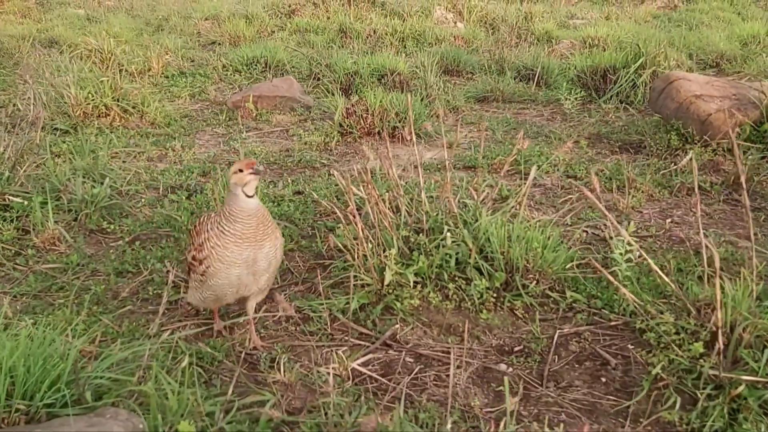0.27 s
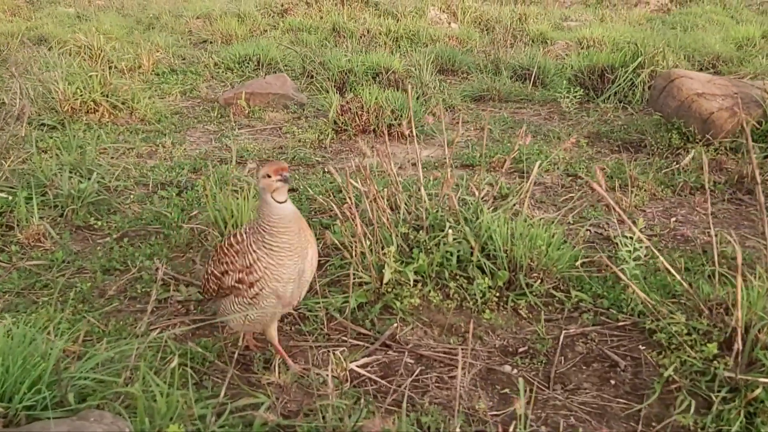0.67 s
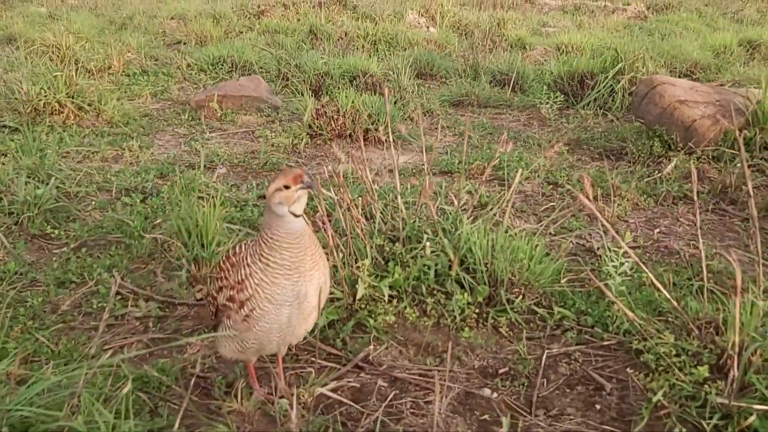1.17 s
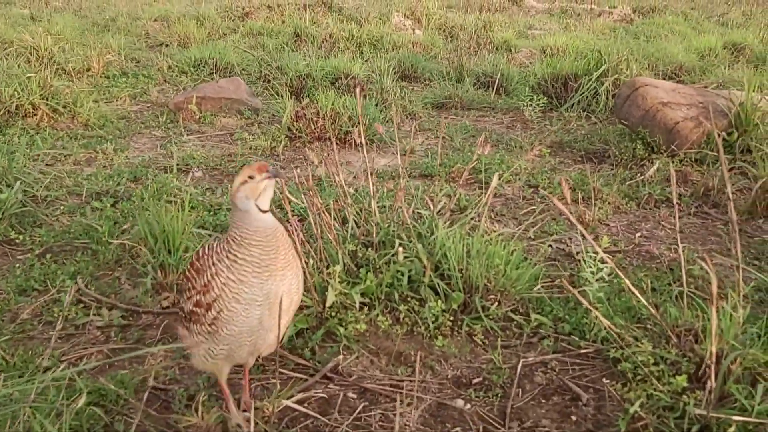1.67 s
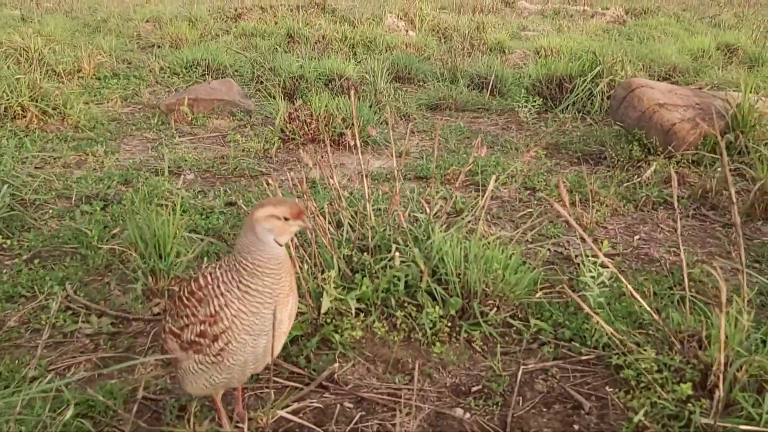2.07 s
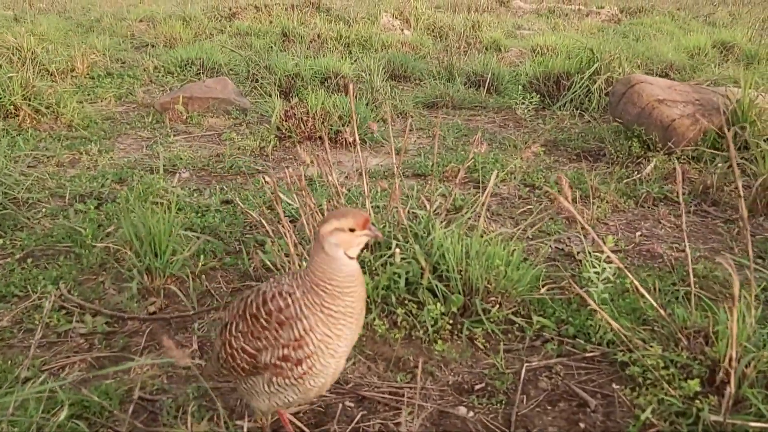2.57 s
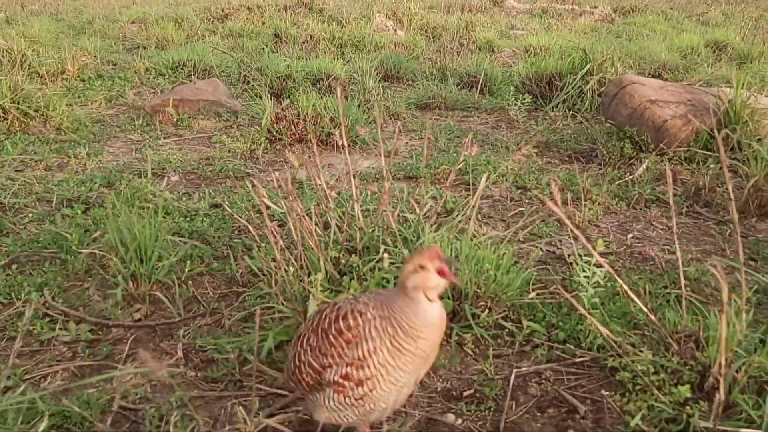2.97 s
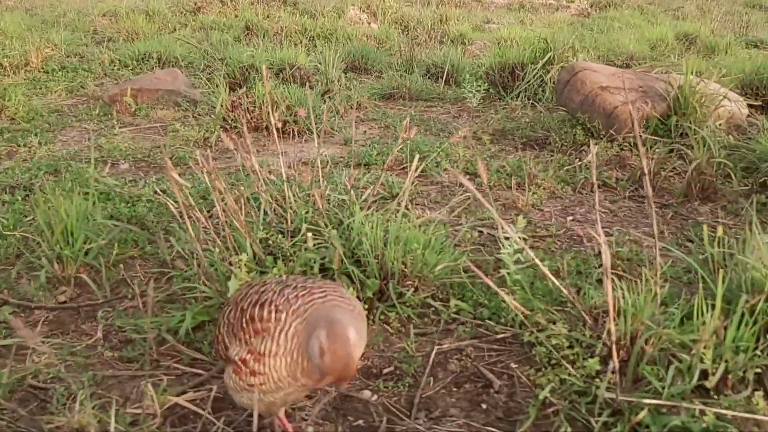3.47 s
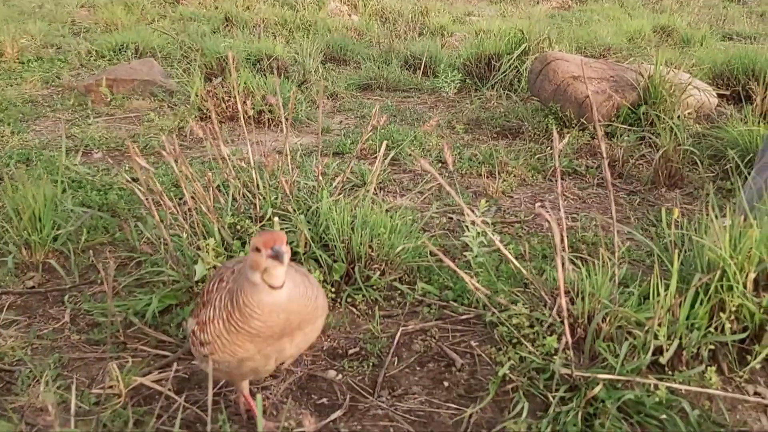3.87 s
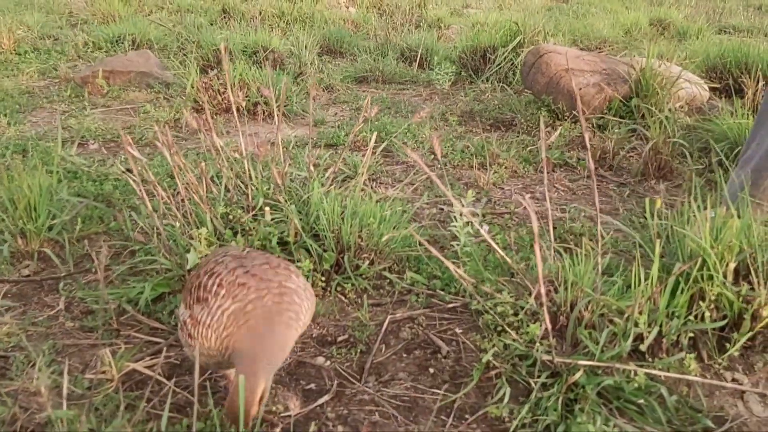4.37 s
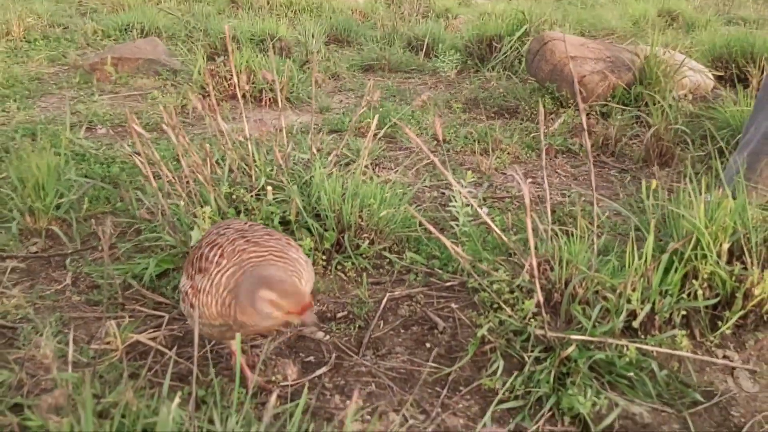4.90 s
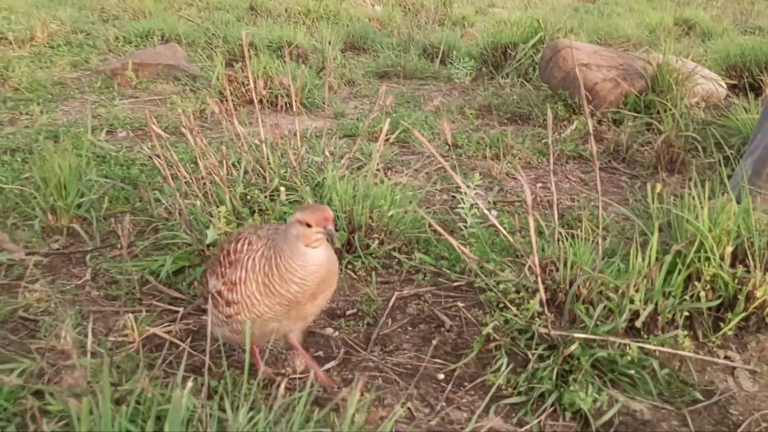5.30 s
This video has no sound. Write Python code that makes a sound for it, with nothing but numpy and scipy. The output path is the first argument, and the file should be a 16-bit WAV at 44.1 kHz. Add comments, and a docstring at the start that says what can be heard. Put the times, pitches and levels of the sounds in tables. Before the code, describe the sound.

Two wild game birds duet close by with piercing whistles, raspy high calls and hoarse clucks, over a faint rumble of wind.

```python
"""Two francolins duet close by in an open field, over a faint hush and a low rumble of air.
One opens with a piercing level whistle, a nearly pure tone of its syrinx, and gives eight in all.
The other breaks in on the first six: its syrinx rasps, twice locks into a clear note and slides down,
then pulses ring its throat in ever softer hoarse clucks. The seventh whistle goes unanswered,
a few pecks and steps crunch in the dry grass, and one more whistle closes the scene."""
import sys
import numpy as np
from scipy import signal
from scipy.fft import rfft, irfft, next_fast_len
from scipy.io import wavfile
from scipy.ndimage import uniform_filter1d, minimum_filter1d

SR = 44100
rng = np.random.default_rng(int(sys.argv[2]) if len(sys.argv) > 2 else 0)


def wrap_up_sound(samples):
    """Save the sound to the file named by the first command line argument, as 16-bit audio."""
    columns = np.atleast_2d(samples).T
    # keep every value between -1 and 1, then stretch to whole-number steps
    tamed = np.clip(columns, -1, 1)
    steps = np.round(tamed * 32767).astype(np.int16)
    wavfile.write(sys.argv[1], SR, steps)


N = 244302
TIME = np.arange(N) / SR


def from_db(db):
    """Decibels to gain."""
    return 10 ** (np.asarray(db) / 20)


def rms_one(x):
    """Scale to unit rms."""
    return x / np.sqrt(np.mean(x ** 2) + 1e-20)


def follow(rows, at):
    """Read each column of a table as a curve along its first column."""
    first, *columns = np.transpose(rows)
    return [np.interp(at, np.maximum.accumulate(first), c) for c in columns]


def bell(x, centre, width):
    """A smooth hump of height 1."""
    return 1 / (1 + ((x - centre) / width) ** 2) ** 2


def step(x, at, width):
    """A smooth rise from 0 to 1."""
    return .5 + .5 * np.tanh(2 * (x - at) / width)


def window(start, end, rise, fall):
    """Sample numbers of an event and its soft-edged gate; times in seconds."""
    i = np.arange(max(int(start * SR), 0), min(int(end * SR), N))
    edge = np.clip(np.minimum((i / SR - start) / rise, (end - i / SR) / fall), 0, 1)
    return i, np.sin(edge * np.pi / 2) ** 2


def waver(rate, size):
    """Random modulation that glides to a new value `rate` times a second."""
    knots = rng.standard_normal(size + 2)
    return np.interp(np.arange(size) * min(rate / SR, 1), np.arange(size + 2), knots)


def noise(spectrum, size):
    """Coloured noise at unit rms, rolled off beyond both ends of its spectrum."""
    hz, db = np.transpose(spectrum)
    padded = next_fast_len(size)
    f = np.fft.rfftfreq(padded, 1 / SR) + 1
    colour = from_db(np.interp(np.log(f), np.log(hz), db))
    roll_off = np.minimum(f / hz[0], 1) ** 2 * np.minimum(hz[-1] / f, 1) ** 2
    return rms_one(irfft(rfft(rng.standard_normal(padded)) * colour * roll_off, padded)[:size])


def stereo_noise(spectrum, apart_db):
    """A noise bed, partly shared and partly each ear's own."""
    shared = noise(spectrum, N)
    return rms_one(shared + from_db(apart_db) * np.array([noise(spectrum, N), noise(spectrum, N)]))


def phase_of(hz):
    """Running phase of an oscillator."""
    return 2 * np.pi * np.cumsum(hz) / SR


def formant(x, hz, width_hz):
    """A throat resonance: two band-passes in series, the second twice as wide."""
    for width in (width_hz, 2 * width_hz):
        r = np.exp(-np.pi * width / SR)
        feedback = [1, -2 * r * np.cos(2 * np.pi * hz / SR), r * r]
        x = signal.lfilter(np.array([1, 0, -1]) * (1 - r * r) / 2, feedback, x)
    return x


def place(x, pan_db, lag_ms=0):
    """Pan a sound, positive to the left; the right ear hears it lag_ms later."""
    left = from_db(pan_db)
    late = np.roll(x, round(lag_ms * SR / 1000))
    return np.array([left * x, late]) * 2 / (1 + left)


# Colour of the quiet field: freq_hz, density_db
HUSH_SPECTRUM = [(250, -9.5), (450, -14.5), (800, -24), (1800, -25.5), (3000, -33.5), (6000, -36.5),
                 (10000, -42.5), (16000, -46)]


def field_hush(level_db=-70):
    """The open field lays a faint, steady bed under everything."""
    return from_db(level_db) * stereo_noise(HUSH_SPECTRUM, apart_db=1)


# Contour of the breeze: time_s, level_db
BREEZE_CONTOUR = [(0.0, -64), (0.23, -61), (0.49, -55.5), (0.89, -62.5), (1.14, -60), (2.73, -65.5),
                  (2.93, -65.5), (5.54, -63.5)]
# Low bumps of air: centre_s, level_db
AIR_BUMPS = [(0.301, -51.5), (0.504, -47), (.63, -43.5), (1.07, -49), (1.15, -48.5)]
# Colour of the rumble: freq_hz, density_db
RUMBLE_SPECTRUM = [(25, -17), (45, -6), (65, 2.5), (100, 2), (135, -3.5), (175, -7), (230, -15), (330, -13),
                   (450, -27.5), (600, -37.5)]


def wind_rumble(lift_db=4.5, gust_db=3, gusts_per_s=28, bump_width_s=.048):
    """Light air rumbles on the microphone, with a few soft bumps early on."""
    contour_db, = follow(BREEZE_CONTOUR, TIME)
    breeze = from_db(contour_db + lift_db + gust_db * waver(gusts_per_s, N))
    bumps = sum(from_db(db) * bell(TIME, centre, bump_width_s) for centre, db in AIR_BUMPS)
    return (breeze + bumps) * stereo_noise(RUMBLE_SPECTRUM, apart_db=5.5)


# Slaps off ground and stones: delay_s, left_db, right_db
GROUND_ECHOES = [(0.013, -29, -22.5), (.070, -46.5, -46)]


def ground_reflections(x, dull_hz=3200, bright_hz=4500):
    """Grass close by scatters the calls at once; stones further off send back dull echoes."""
    t = TIME[:SR // 2]

    def scatter(db, t60_s):
        """A dying spray of reflections, different at each ear."""
        spray = rng.standard_normal((2, len(t))) * from_db(-60 * t / t60_s)
        return spray * from_db(db) / np.sqrt(np.sum(spray[0] ** 2))

    far, near = scatter(db=-41, t60_s=.22), scatter(db=-17, t60_s=.0067)
    for delay, *ear_db in GROUND_ECHOES:
        far[:, int(delay * SR)] += from_db(ear_db)
    dull = signal.sosfilt(signal.butter(2, dull_hz, fs=SR, output="sos"), x + 1e-18)
    # thin stalks reflect only the short waves
    bright = signal.sosfilt(signal.butter(2, bright_hz, "high", fs=SR, output="sos"), x + 1e-18)
    return (signal.fftconvolve(dull, far, axes=1) + signal.fftconvolve(bright, near, axes=1))[:, :N]


# Pecks and steps: start_s, level_db, t60_s
PECK_CUES = [(4.815, -70.5, 0.033), (4.885, -82, 0.03), (4.930, -80, 0.03), (5.155, -62, 0.032),
             (5.191, -68, 0.057), (5.212, -63, 0.08), (5.232, -63.5, 0.037)]
# Colour of dry stalks and soil: freq_hz, density_db
STALK_SPECTRUM = [(300, 2), (700, 8.5), (1100, 1), (1700, 3.5), (2500, -15), (3400, -9), (4500, -19),
                  (6000, -23), (9000, -29.5), (15000, -28)]


def pecks(grain_db=7.4):
    """Beak and feet make short, grainy crunches in the dry grass."""
    out = np.zeros(N)
    for start, db, t60 in PECK_CUES:
        i, gate = window(start, start + t60, rise=.0012, fall=.005)
        crunch = rms_one(noise(STALK_SPECTRUM, len(i)) * from_db(grain_db * waver(530, len(i))))
        out[i] += gate * crunch * from_db(db - 60 * (i / SR - start) / t60)
    return out


# Stereo image of the answering bird: freq_hz, pan_db, left_lead_rad
ANSWER_IMAGE = [(100, 0, 0), (600, -1, .5), (1500, -7, 1.45), (2650, -5.5, 1.9), (4100, -5, 1.9),
                (5200, -4, -1.5), (7000, 3, -1.1), (8200, -3, -1.0), (12000, -5, -1.2), (16000, -5, -1.0)]


def microphone_shadow(x):
    """The microphone's body shades and delays each frequency differently at its two ports."""
    size = next_fast_len(N + 2000)
    pan_db, lead = follow(ANSWER_IMAGE, np.fft.rfftfreq(size, 1 / SR))
    left = from_db(pan_db)
    response = np.array([left, np.exp(-1j * lead)]) * 2 / (1 + left)
    return irfft(rfft(x, size) * response, size)[:, :N]


# Colour of the rasp in clucks and phrases: freq_hz, density_db
RASP_SPECTRUM = [(150, -27.5), (450, -20), (750, -28), (1200, -16.5), (1800, 9), (2250, -11.5), (2900, 7.5),
                 (3600, 5.5), (4600, -6.5), (5800, 3), (7500, -8), (9400, -15), (11500, -12),
                 (15500, -18.5)]


def rasp_noise(modulation):
    """The chaotic syrinx: hoarse noise, chopped by the modulation, at unit rms."""
    return rms_one(noise(RASP_SPECTRUM, len(modulation)) * modulation)


def squeak(progress, pulse_phase, strain, highest_hz=2800, end_hz=1693, ring_db=7, shimmer_db=2):
    """A rough squeak falls, from higher under more strain, and flares at the throat resonance."""
    size = len(progress)
    hz = end_hz + (highest_hz - end_hz) * strain * (1 - step(progress, at=.53, width=.2))
    ringing = bell(hz, centre=1850, width=260)
    flare = from_db(ring_db * ringing + shimmer_db * waver(400, size))
    chop = 1 + .45 * np.cos(pulse_phase)
    jitter = (.028 + .05 * (1 - ringing)) * waver(1200, size)
    wander = .025 * waver(50, size)
    tone = np.sin(phase_of(hz * (1 + jitter + wander)))
    return bell(progress, centre=.63, width=.29) * flare * chop * tone


# Clucks trailing each phrase: start_s, level_db, effort_0_to_1
CLUCK_CUES = [(.399, -21, 1), (.537, -24, 0.56), (0.67, -34.5, 0.16), (1.084, -22, 1), (1.226, -24.5, 0.58),
              (1.364, -34.5, 0.15), (1.836, -24, 1), (1.971, -25.5, 0.59), (2.112, -36.5, 0.05),
              (2.555, -23, 0.96), (2.692, -26, .58), (2.823, -40.5, 0.2), (3.274, -20.5, 0.94),
              (3.409, -39.5, 0.49), (3.557, -56.5, 0.22), (4.065, -27, 0.85), (4.194, -39.5, .33)]
# Throat resonances: freq_hz, width_hz, gain_db
THROAT_FORMANTS = [(380, 180, -25.5), (1333, 540, -2), (1704, 410, 12), (2730, 900, -15)]


def clucks(gentle_hz=531, effort_hz=78.98, gentle_s=.058, effort_s=.025, shimmer_db=5, tilt_db=6.5,
           catch_at=.49, held_db=-11, tire_db=-14, squeak_above=.38, squeak_db=8):
    """Uneven pulses on an arching pitch ring the throat; effort adds roughness, rasp and a squeak."""
    out = np.zeros(N)
    for start, db, effort in CLUCK_CUES:
        length = gentle_s + effort_s * effort
        i, gate = window(start, start + length, rise=.0041, fall=.019)
        progress, size = (i / SR - start) / length, len(i)
        hz = (gentle_hz + effort_hz * effort) * (1 - 1.3 * (progress - .33) ** 2)
        jitter = (.025 + .24 * effort) * waver(700, size)
        phase = phase_of(hz * (1 + jitter))
        opening = 1 + .21 * np.cos(phase)
        pulses = np.diff(phase // (2 * np.pi), prepend=0)
        pulses *= from_db(shimmer_db * effort * waver(400, size))
        turbulence = .085 * effort * opening * rng.standard_normal(size)
        voice = np.zeros(size)
        for k, (formant_hz, width_hz, gain_db) in enumerate(THROAT_FORMANTS):
            gain = from_db(gain_db + tilt_db * k * (effort - 2))   # gentle clucks are darker
            voice += (-1) ** k * gain * formant(pulses + turbulence, formant_hz, width_hz)
        # the harder the cluck, the more it is held back before it catches; then it tires
        held = 1 - step(progress, catch_at, width=.066)
        shape_db = held_db * effort * held + tire_db * (progress - catch_at) ** 2 - 1
        voice = rms_one(voice) * from_db(shape_db)
        rasp_level = bell(progress, centre=.46, width=.23) * from_db(-4 - 23 * (1 - effort))
        rasp = rasp_level * rasp_noise(opening)
        strain = max(effort - squeak_above, 0) / (1 - squeak_above)
        squeak_level = strain * from_db(squeak_db) * (1 - held / 2)
        out[i] += gate * from_db(db) * (voice + rasp + squeak_level * squeak(progress, phase, strain))
    return out


# Phrase timing around the start of its first note
LEAD_IN_S, BREAK_S, SECOND_NOTE_S, SLIDE_S, COLLAPSE_S, END_S = .048, .0255, .047, .07, .092, .125
FLIP_S = .004   # the syrinx needs this long to change between rasp and note


def syrinx(t):
    """How firmly the syrinx is locked on the note (0-1), and the jolt of each flip."""
    locked = step(t, 0, FLIP_S) - step(t, BREAK_S, FLIP_S) + step(t, SECOND_NOTE_S, FLIP_S)
    jolt = sum(bell(t, at, FLIP_S) for at in (-FLIP_S / 2, BREAK_S, SECOND_NOTE_S))
    return np.clip(locked, 0, 1), jolt


def thumps(t, decay_s=.012):
    """A short low thump sounds at each flip between rasp and note."""
    flips = (0, BREAK_S, SECOND_NOTE_S)
    envelope = sum(step(t, at, FLIP_S) * np.exp(-np.abs(t - at) / decay_s) for at in flips)
    return envelope * noise([(70, 4), (105, 4), (160, -9.5), (350, -7)], len(t))


def squeal(t, hz, rise_hz_per_s=6000, peak_s=-.038, jitter=.07, shimmer_db=4, throat_db=-3):
    """An unsteady upper vibration bites through the opening rasp; its first shove rings the throat."""
    pitch = (hz + rise_hz_per_s * (t + LEAD_IN_S / 2)) * (1 + jitter * waver(1800, len(t)))
    shimmer = from_db(shimmer_db * waver(700, len(t)))
    upper = bell(t, peak_s, width=.034) * shimmer * np.sin(phase_of(pitch))
    throat = rms_one(formant(rng.standard_normal(len(t)), hz=1900, width_hz=250))
    return upper + from_db(throat_db) * bell(t, peak_s, width=.012) * throat


# The answering bird's phrases: first_note_s, pitch_hz, note_db, octave_db, third_partial_db,
# rasp_db, squeal_hz, squeal_db, thump_db
PHRASE_CUES = [(0.197, 2587, -8.5, -11, -22, -25.5, 3400, -27.5, -53.5),
               (0.873, 2623, -6, -17.5, -24, -26.5, 3400, -38.5, -45),
               (1.623, 2634, -6.5, -15, -28, -26.5, 3300, -36, -51.5),
               (2.342, 2615, -6.5, -19.5, -24.5, -29, 3200, -18.5, -45),
               (3.063, 2652, -6.5, -21, -25, -24, 3550, -12, -39.5),
               (3.862, 2648, -14.5, -16, -20, -25, 4150, -18, -31.5)]


def phrases(rasp_flat=.085, sag_hz_per_s=700, slide_hz_per_s=17000, fade_db_per_s=316,
            subharmonic_db=-18, growl_hz=430, growl_depth=.95, growl_s=.0067, release_db_per_s=800):
    """The syrinx flips between a chaotic half-pitch rasp and a rich note, then collapses into a growl."""
    out = np.zeros(N)
    for start, hz, note_db, octave_db, third_db, rasp_db, squeal_hz, squeal_db, thump_db in PHRASE_CUES:
        i, gate = window(start - LEAD_IN_S, start + END_S, rise=.028, fall=.006)
        t, size = i / SR - start, len(i)
        locked, jolt = syrinx(t)
        second_note = step(t, SECOND_NOTE_S, FLIP_S)
        slide_age = np.maximum(t - SLIDE_S, 0)
        collapse = step(t, COLLAPSE_S - growl_s / 2, growl_s)
        last_gasp = bell(t, COLLAPSE_S + FLIP_S, growl_s)

        flatten = 1 - rasp_flat * (1 - locked) * (1 - jolt)
        pitch = hz * flatten - sag_hz_per_s * t - slide_hz_per_s * slide_age
        roughness = 1 - locked + collapse + slide_age / (END_S - SLIDE_S)
        phase = phase_of(pitch * (1 + (.002 + .045 * roughness) * waver(1200, size)))
        # as the pressure drops, an uneven flutter chops the sliding note
        flutter = np.cos(phase_of(growl_hz * (1 + .2 * waver(600, size))))
        growl = 1 + growl_depth * collapse * flutter

        fade = from_db(-fade_db_per_s * slide_age)
        clear = (locked + from_db(-22) * (1 - locked)) * fade * (1 - .46 * collapse)
        bright = clear * from_db(-4 * second_note) * np.sqrt(fade)
        subharmonic = (1 - locked) * step(t, -.02, LEAD_IN_S) * from_db(-6 * (t > 0))
        subharmonic += from_db(-15) * last_gasp
        voice = from_db(note_db) * clear * np.sin(phase)
        voice += from_db(note_db + subharmonic_db) * subharmonic * np.sin(phase / 2)
        for k, db in enumerate([octave_db, third_db, third_db - 9, third_db - 4, third_db - 13]):
            voice += from_db(db) * bright * fade ** (k / 4) * np.sin((k + 2) * phase)   # top dies first

        # the rasp opens with a bark, spits at each flip, sinks under the notes and returns in the growl
        bark = from_db(4) * bell(t, centre=-.03, width=.01)
        body = from_db(-4) * (1 - locked) + from_db(-10 - 5 * second_note) * locked
        rasp_level = from_db(rasp_db) * (bark + from_db(5) * jolt + body + from_db(-11) * last_gasp)
        grain = from_db(3 * waver(700, size))
        call = voice * growl + rasp_level * rasp_noise(grain * (1.2 + flutter))
        call += from_db(squeal_db) * squeal(t, squeal_hz) + from_db(thump_db) * thumps(t)
        release = from_db(-release_db_per_s * np.maximum(t - COLLAPSE_S - FLIP_S, 0))
        out[i] += gate * release * call
    return out


# The lead bird's whistles: start_s, end_s, pitch_hz, tone_db, overtones_db, hiss_db, tone_pan_db
WHISTLE_CUES = [(0.03, 0.272, 2692, -21, -2.5, -32.5, 14), (0.696, 0.942, 2660, -12.5, -2.5, -33.5, -11.5),
                (1.472, 1.713, 2680, -15.5, -5.5, -36, -17), (2.187, 2.417, 2663, -16, -4.5, -39.5, -15),
                (2.907, 3.144, 2676, -16.5, -5.5, -38.5, -15.5), (3.627, 3.846, 2660, -15, -12.5, -38, -11),
                (4.44, 4.664, 2678, -15.5, -14, -35.5, -9.5), (5.488, 5.725, 2680, -19.5, -4.5, -34.5, 12)]
# Harmonic balance, fundamental first: gain_db
WHISTLE_HARMONICS = [4, -34, -20.5, -40.5, -42]
# Colour of air through the beak: freq_hz, density_db
BEAK_SPECTRUM = [(300, -21), (550, -14), (1100, -27), (2000, -19.5), (2700, -0.5), (3400, -12),
                 (4800, -23.5), (6100, -25), (7200, -7), (8000, 3.5), (9200, -15), (11500, -14.5),
                 (15500, -11)]


def whistles(scoop=.035, scoop_s=.016, sag=.02, jitter=.0021, arch_db=3.5, flutter_db=1.37,
             tremble_db=-21, hiss_lead_s=.024, bloom_s=.049):
    """A nearly pure tone scoops up to pitch; air hisses through the beak just before it speaks."""
    out = np.zeros((2, N))
    for start, end, hz, tone_db, overtones_db, hiss_db, pan_db in WHISTLE_CUES:
        i, airflow = window(start - hiss_lead_s, end + .0061, rise=.078, fall=.13)
        t, size = i / SR, len(i)
        age = np.maximum(t - start, 0)
        progress = age / (end - start)
        # the membrane trembles faintly, then locks in within a few milliseconds
        tremble = bell(t, start, width=.014) * step(t, start - hiss_lead_s / 2, hiss_lead_s / 2)
        edge = np.clip(np.minimum((t - start) / .005, (end - t) / .02), 0, 1)
        locked = np.sin(np.pi / 2 * edge) ** 2

        pitch = hz * (1 - scoop * np.exp(-age / scoop_s) - sag * progress ** 2)
        roughness = (jitter + .068 * (1 - locked) ** 2) * waver(2000, size)
        phase = phase_of(pitch * (1 + roughness + jitter * waver(40, size)))
        swell_db = -arch_db * (2 * progress - 1) ** 2 + flutter_db * waver(55, size)
        level = np.maximum(locked, from_db(tremble_db) * tremble) * from_db(swell_db)
        partials = [level * from_db(db) * np.sin(k * phase) for k, db in enumerate(WHISTLE_HARMONICS, 1)]
        bloom = 1 - np.exp(-age / bloom_s) / 2
        overtones = bloom * from_db(overtones_db) * sum(partials[1:])
        hiss = airflow * from_db(hiss_db) * noise(BEAK_SPECTRUM, size)
        out[:, i] += place(from_db(tone_db) * partials[0], pan_db, lag_ms=.023)
        out[:, i] += place(overtones + hiss, pan_db=-6, lag_ms=-.025)
    return out


def scene():
    """Both birds and their reflections, over the wind and the hush of the field."""
    birds = whistles() + microphone_shadow(phrases() + clucks()) + place(pecks(), pan_db=-11)
    background = wind_rumble() + field_hush()
    return background + ground_reflections(birds) + birds


def record(dry, ceiling=.93, release_db_per_s=500, cutoff_hz=15950):
    """A quick limiter ducks the peaks where both birds coincide; the top is cut steeply."""
    over_db = 20 * np.log10(np.maximum(np.abs(dry).max(axis=0) / ceiling, 1))
    duck_db = np.maximum.accumulate(over_db + release_db_per_s * TIME) - release_db_per_s * TIME
    gain = uniform_filter1d(minimum_filter1d(from_db(-duck_db), size=65), size=65)
    return signal.sosfilt(signal.ellip(10, .2, 90, cutoff_hz, fs=SR, output="sos"), dry * gain)


dry = scene()
out = record(dry)
wrap_up_sound(out)
```